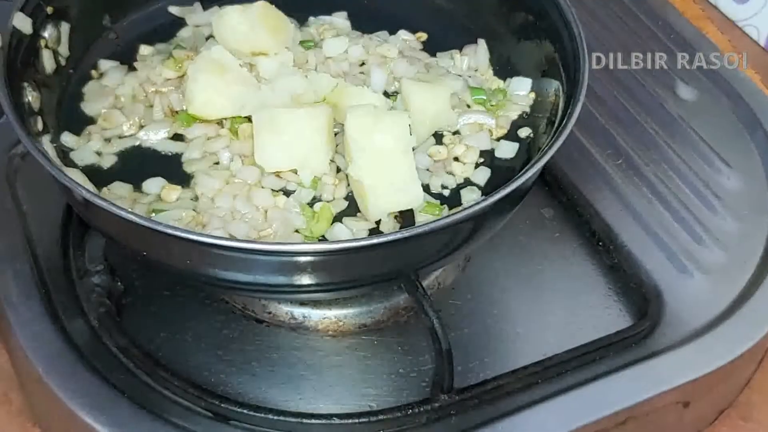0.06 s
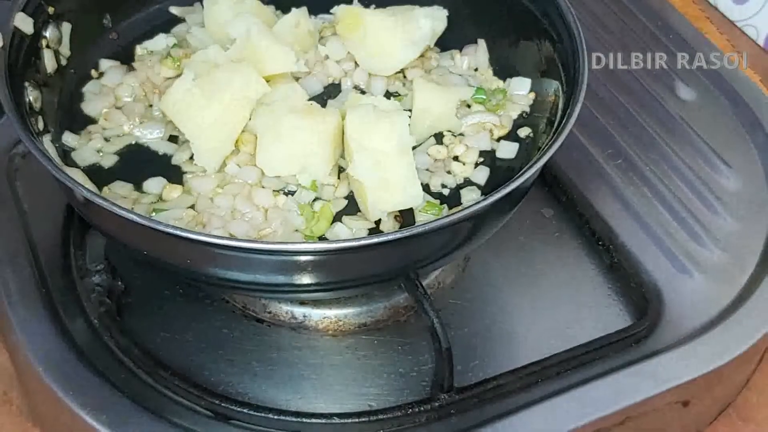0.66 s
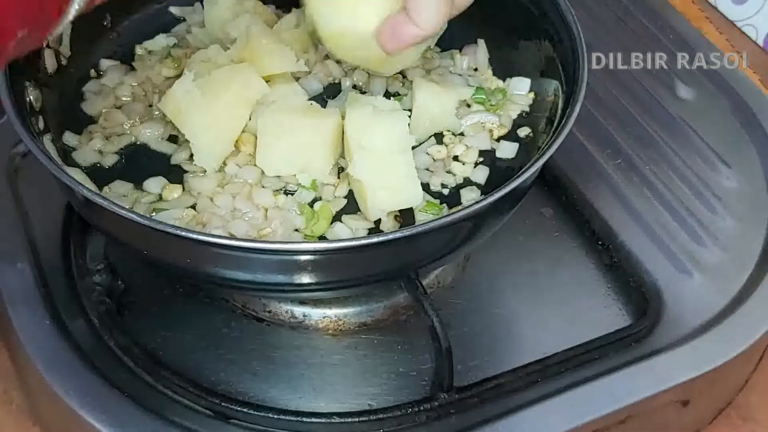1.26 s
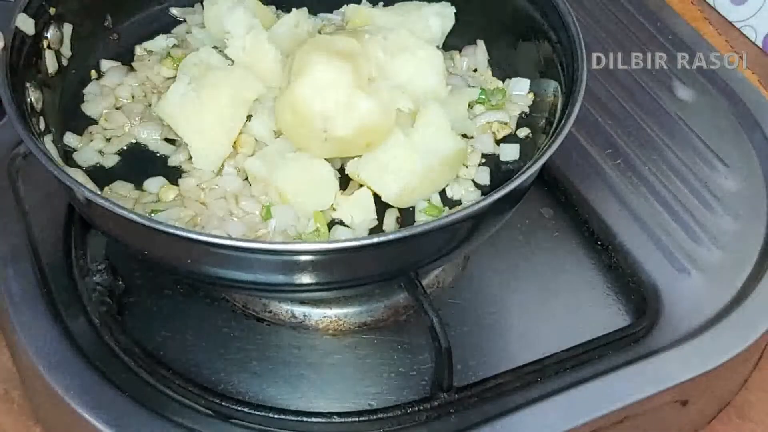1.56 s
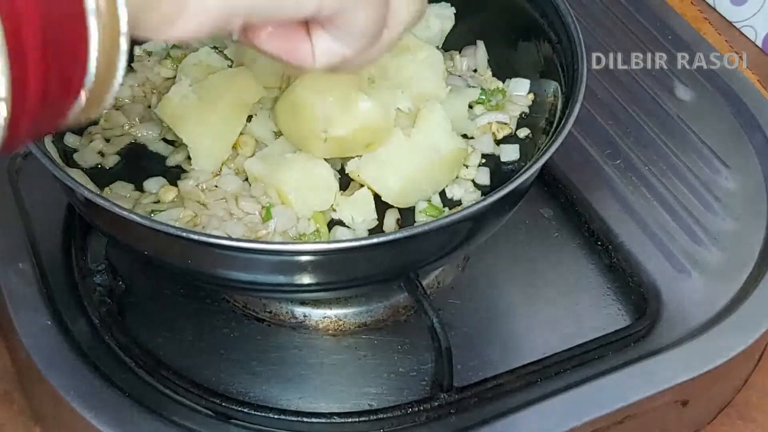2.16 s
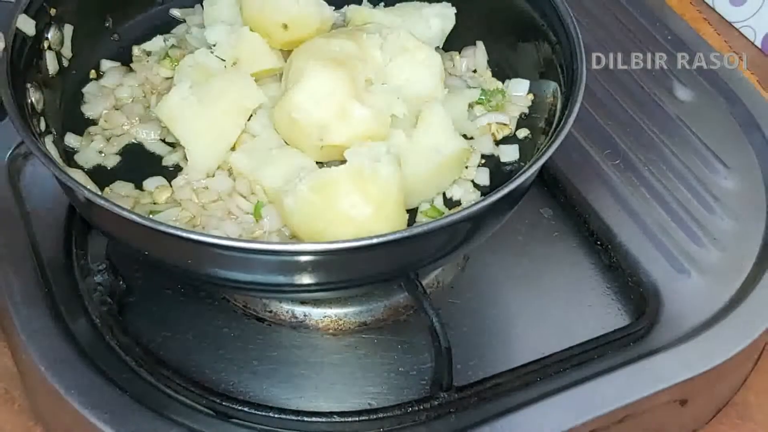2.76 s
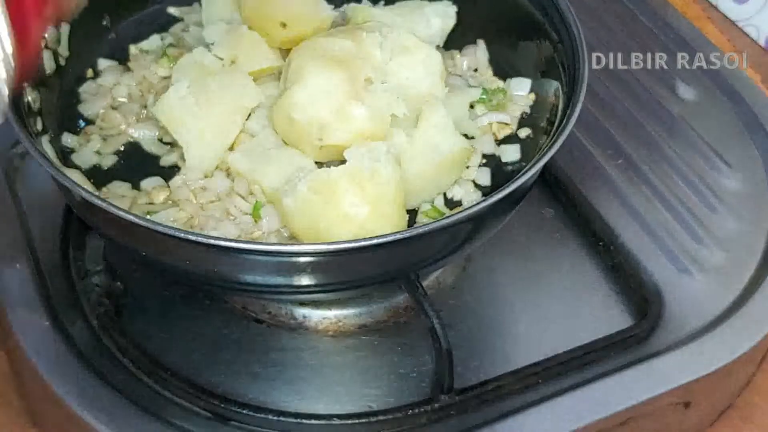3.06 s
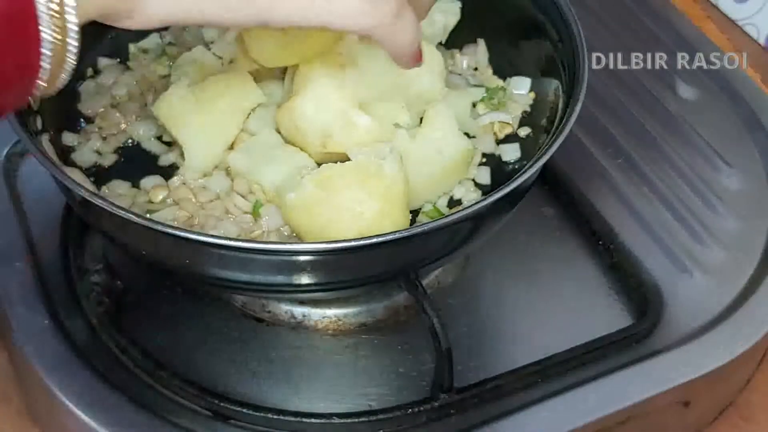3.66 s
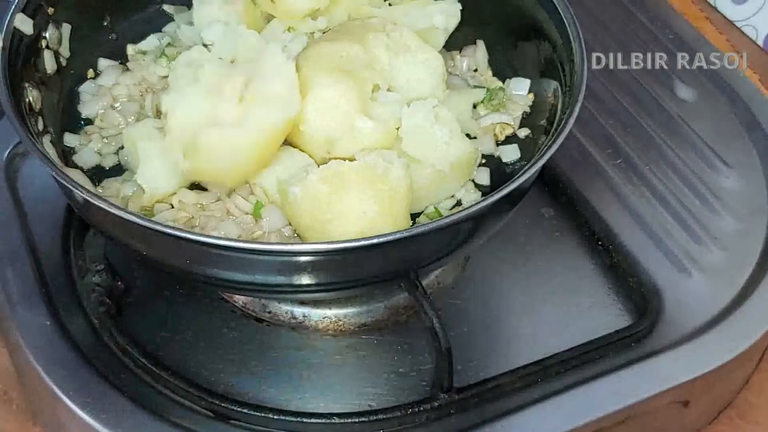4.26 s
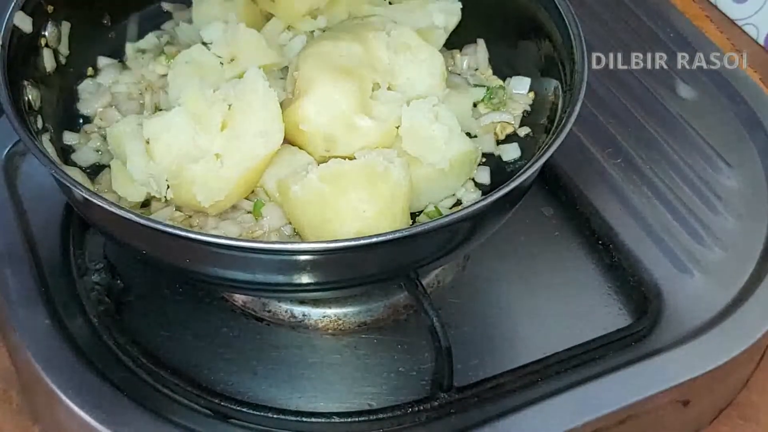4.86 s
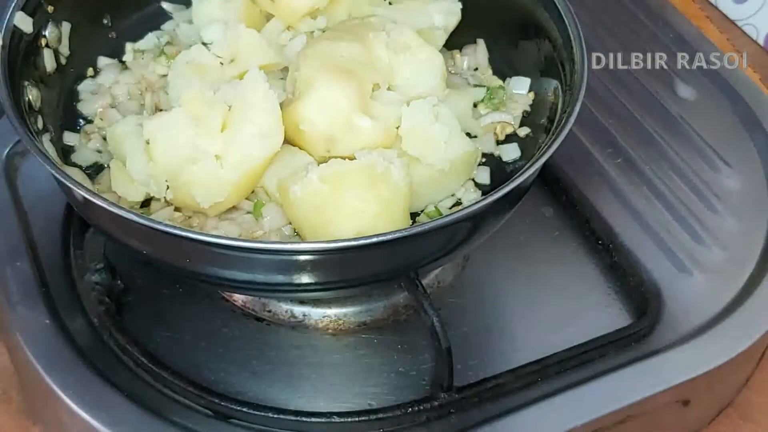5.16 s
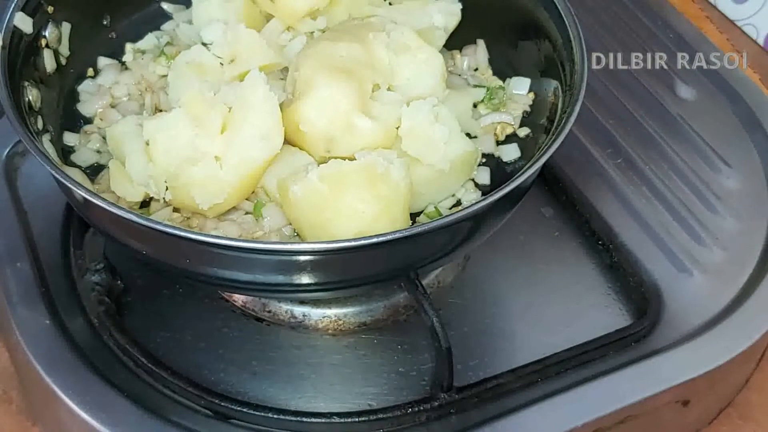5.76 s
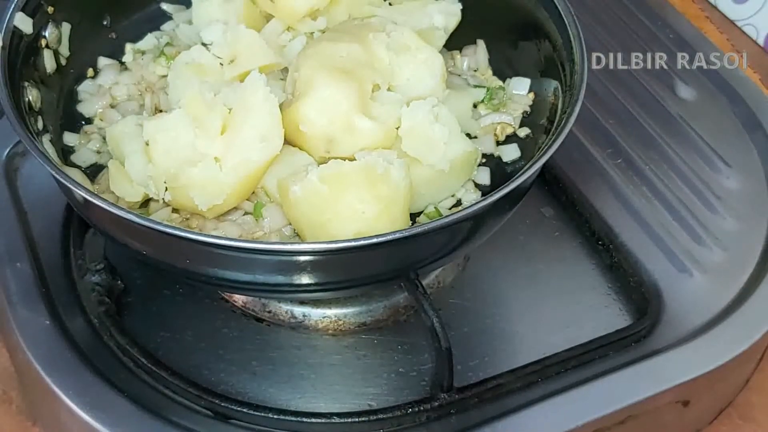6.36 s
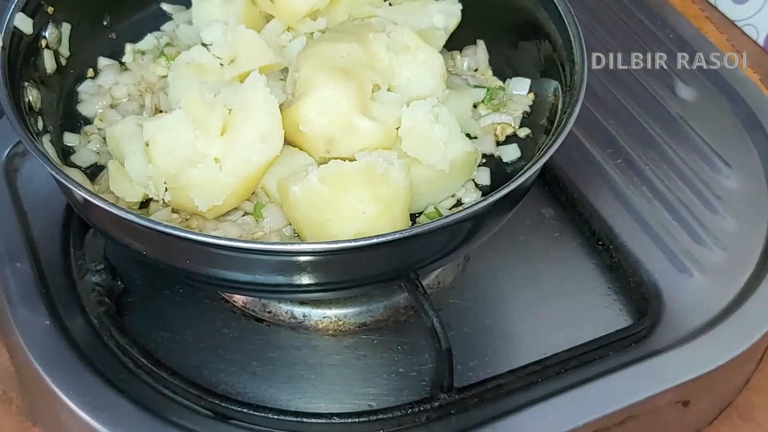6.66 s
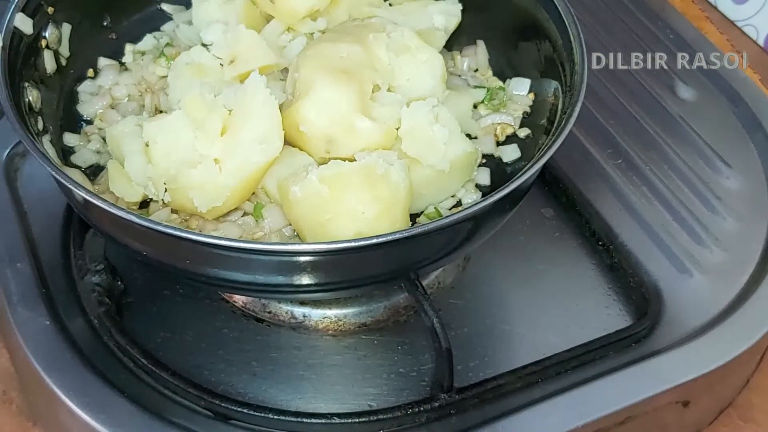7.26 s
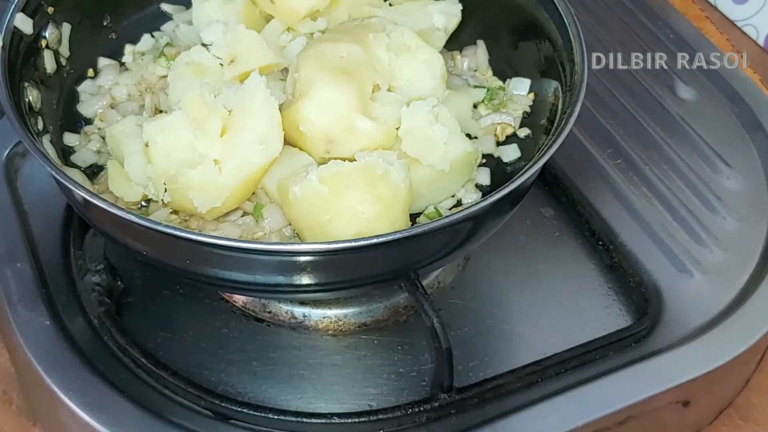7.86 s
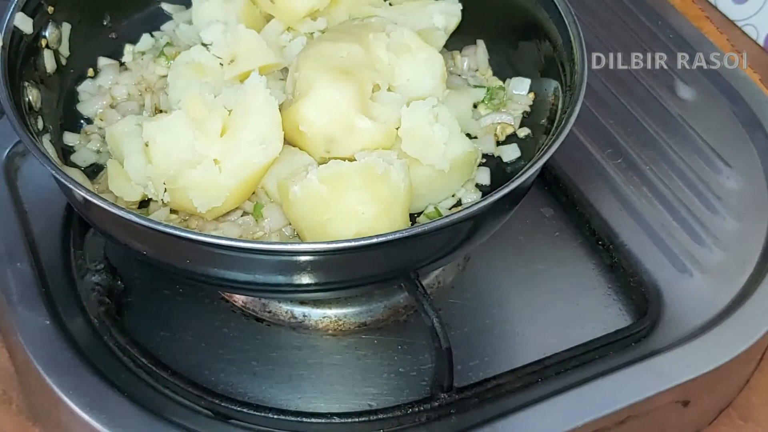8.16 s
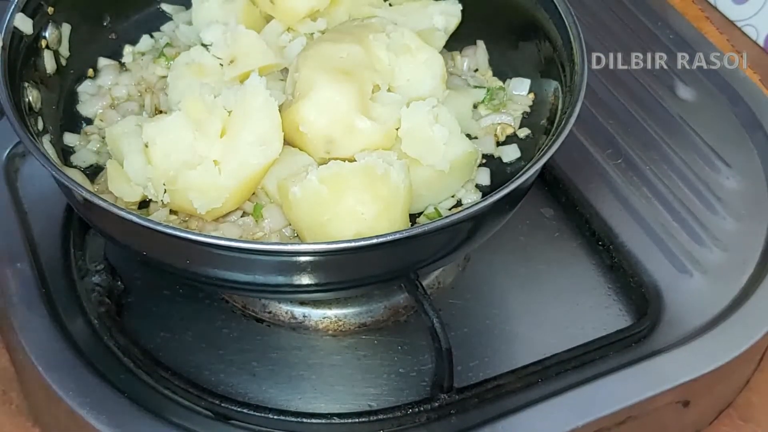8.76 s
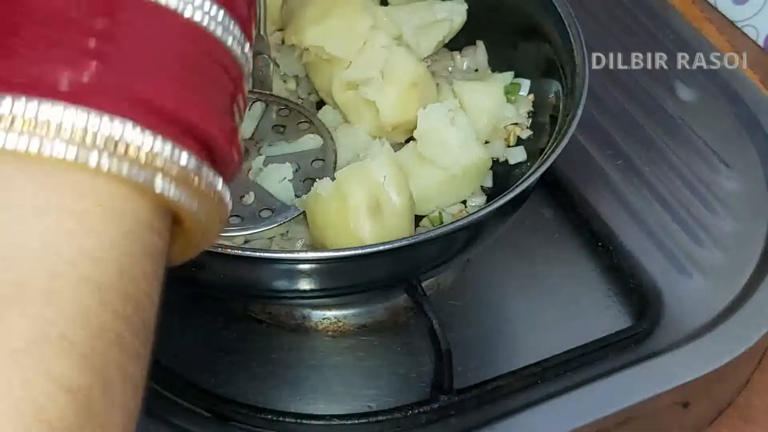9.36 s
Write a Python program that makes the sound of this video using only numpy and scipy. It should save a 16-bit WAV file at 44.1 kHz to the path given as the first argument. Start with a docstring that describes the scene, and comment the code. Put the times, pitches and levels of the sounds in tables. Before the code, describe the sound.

Onions sizzle gently over a humming gas burner as potatoes drop in, dishes clack, and something rumbles across the worktop.

```python
"""Chopped onions fry gently over a humming gas burner, and water drops spit in the oil now and then.
From 1.4 s boiled potatoes are dropped in by hand: the frying flares, steam puffs out, bangles jingle
and more steam squeaks faintly. Around 4 s a bowl and then a plate clack beside the stove.
Near 7 s something is dragged across the worktop with a hollow rumble, and steel clinks lightly.
Just after 9 s a steel spatula comes down into the pan and the frying flares again."""
import sys
import numpy as np
from scipy import signal
from scipy.fft import rfft, irfft, next_fast_len
from scipy.io import wavfile

SR = 44100
rng = np.random.default_rng(int(sys.argv[2]) if len(sys.argv) > 2 else 0)


def put_to_file(sound):
    """Save the sound as 16-bit audio at rate SR, in the file named by the first command-line argument."""
    columns = np.atleast_2d(sound).T  # one column per channel
    safe = np.clip(columns, -1, 1)
    whole_steps = np.round(safe * 32767)
    wavfile.write(sys.argv[1], SR, whole_steps.astype(np.int16))


N = 418509
TIME = np.arange(N) / SR


def from_db(db):
    """Turn decibels into a number to multiply by."""
    return 10 ** (np.asarray(db) / 20)


def unit_level(x):
    """Scale a sound so that its average strength (rms) is 1."""
    return x / np.sqrt(np.mean(x ** 2) + 1e-20)


def colour(x, spectrum):
    """Turn pitches up or down along a curve of (f/Hz, level/dB) points."""
    hz, db = np.transpose(spectrum)
    size = next_fast_len(N, True)
    bins = np.fft.rfftfreq(size, 1 / SR)
    gain = from_db(np.interp(np.log(bins + 1), np.log(hz), db))
    return irfft(rfft(x, size) * gain, size)[..., :N]


def low_pass(x, hz, order=2):
    """Dull a sound above hz."""
    return signal.sosfilt(signal.butter(order, min(hz, SR / 2 - 100), fs=SR, output="sos"), x + 1e-18)


def high_pass(x, hz):
    """Thin out a sound below hz."""
    return signal.sosfilt(signal.butter(2, hz, "high", fs=SR, output="sos"), x)


def drift(per_s):
    """A random wobble of about size 1 that heads for a new value per_s times a second."""
    targets = rng.standard_normal(4096)
    return unit_level(np.interp(TIME * per_s, np.arange(len(targets)), targets))


def stereo_noise(alike):
    """Hiss for two ears: alike is 0 for nothing shared, 1 for the same in both."""
    return np.sqrt(alike) * rng.standard_normal(N) + np.sqrt(1 - alike) * rng.standard_normal((2, N))


def clicks(per_s, spread_db):
    """Random clicks of uneven size."""
    sizes = from_db(spread_db * np.minimum(rng.exponential(1, N), 5))
    return unit_level(sizes * rng.choice([-1, 1], N) * (rng.random(N) < per_s / SR))


def scatter(x, decay_s):
    """Nearby metal surfaces smear each click, differently for each ear."""
    t = TIME[:SR // 20]
    echoes = rfft(rng.standard_normal((2, len(t))) * np.exp(-t / decay_s))
    evened = irfft(echoes / np.abs(echoes) ** .5)   # so that no pitch sticks out much
    evened /= np.sqrt(np.sum(evened ** 2, axis=1, keepdims=True))
    return signal.oaconvolve(x[None], evened[:, :len(t) // 2], axes=1)[:, :N]


def resonate(force, tones):
    """Make an object ring at its own tones; the narrow ones ring longest."""
    out = 0
    for hz, width, db in tones:
        r = np.exp(-np.pi * width / SR)   # share of the ringing left after one sample
        feedback = [1, -2 * r * np.cos(2 * np.pi * hz / SR), r * r]
        out = out + from_db(db) * (1 - r * r) / 2 * signal.lfilter([1, 0, -1], feedback, force + 1e-18)
    return out


def struck(blows, tones, alike, kick_db, crunch_db, ear_lag_s=0.000085):
    """Each blow is one kick plus a fading crunch of tiny collisions; both make the object ring."""
    crunch, kick, noise = np.zeros((2, N)), np.zeros((2, N)), stereo_noise(alike)
    for s, db, decay_s, bright_hz in blows:
        span = slice(int(s * SR), int(s * SR) + SR // 2)
        t = TIME[span] - TIME[span][0]
        envelope = np.exp(-t / decay_s) * (1 - np.exp(-t * bright_hz / 2))
        crunch[:, span] += from_db(db) * low_pass(noise[:, span] * envelope, bright_hz)
        # the kick carries the energy of the crunch and reaches the left ear first
        impulse = np.array([t == 0, t == t[int(ear_lag_s * SR)]]) * np.linalg.norm(envelope)
        kick[:, span] += from_db(db) * low_pass(impulse, bright_hz)
    return crunch + resonate(from_db(kick_db) * kick + from_db(crunch_db) * crunch, tones)


def with_decays(blows, decay_s, at_hz):
    """Give each blow a fading time: decay_s at brightness at_hz, longer if softer and duller."""
    return [(s, db, decay_s * (at_hz / hz) ** 0.87, hz) for s, db, hz in blows]


def sizzle(per_s, spread_db, hiss_db, decay_s, spots=4):
    """Tiny bursts at several spots in the oil, over a smooth hiss of steam."""
    bursts = sum(scatter(clicks(per_s / spots, spread_db), decay_s) for _ in range(spots))
    return unit_level(bursts) + from_db(hiss_db) * stereo_noise(alike=0.031)


# how strong the crackle and the fizz are at each pitch: f/Hz, level/dB
CRACKLE_COLOUR = [(300, -4.5), (600, -9), (850, -5), (1100, 0), (1400, -1), (1850, 0), (2350, 4.5),
                  (3100, 1.5), (4200, 2), (5500, -2), (7200, -3), (10000, -2), (16000, -3.5)]
FIZZ_COLOUR = [(2500, -37), (5500, -2), (7300, 0.5), (8800, 2), (10300, 1.5), (12000, 3.5), (14000, 1),
               (16000, -1.5)]
# potatoes land or are pushed onto hot metal: t/s, crackle boost/dB, fizz boost/dB
FLARES = [(1.42, 1, 2), (2.58, 0.5, 1.5), (9.17, 2.5, 5.5)]

def frying(flicker_db=0.87, sink_s=4.6, flare_rise_s=0.2):
    """Wet onion crackles and the finest droplets fizz above it; both flicker and flare together."""
    crackle = sizzle(per_s=6000, spread_db=3, hiss_db=-1, decay_s=0.0023)
    fizz = sizzle(per_s=4600, spread_db=5, hiss_db=15.5, decay_s=0.00072)
    crackle_db = -42
    fizz_db = np.interp(TIME, [0, sink_s], [-39.5, -44])   # the fizz sinks slowly from the start until sink_s
    for s, crackle_boost_db, fizz_boost_db in FLARES:
        age = np.maximum(TIME - s, 0) / flare_rise_s
        swell = age * np.exp(1 - age)   # rises fast, then dies as the water boils off
        crackle_db += crackle_boost_db * swell
        fizz_db += fizz_boost_db * swell
    crackle = from_db(crackle_db) * unit_level(colour(crackle, CRACKLE_COLOUR))
    fizz = from_db(fizz_db) * unit_level(colour(fizz, FIZZ_COLOUR))
    return from_db(flicker_db * drift(18)) * (crackle + fizz)


# how strong the flame is at each pitch: f/Hz, level/dB
BURNER_COLOUR = [(20, -23), (40, -42), (54, -13.5), (68, -11.5), (82, -0.5), (96, 4), (116, -5.5),
                 (138, -4.5), (170, -17), (215, -20), (280, -30), (420, -50), (900, -40.5)]

def burner(flutter_db=3):
    """The gas flame gives a low, fluttering hum."""
    hum = unit_level(colour(stereo_noise(alike=0.65), BURNER_COLOUR))
    return from_db(-40.5 + flutter_db * drift(9)) * hum


# the loudest spits of oil and the pitch of their snap: t/s, level/dB, f/Hz
SPITS = [(0.2156, -26.5, 11000), (.663, -31, 9500), (1.851, -25.5, 6360), (1.995, -28, 11500),
         (3.522, -33, 10500), (5.1147, -25.5, 7000), (6.5686, -26.5, 7500), (6.917, -30.5, 10500),
         (8.739, -33, 11000), (8.868, -35, 10500), (9.219, -28, 9000), (9.388, -24.5, 8000)]

def spits(snap_s=0.00029, spray_s=0.014, faint_per_s=0.8, faint_db=-37.5, faint_hz=7500):
    """A water drop bursts in the oil: a sharp snap, then a short spray. Faint ones come at random."""
    out, noise = np.zeros((2, N)), stereo_noise(alike=0.27)
    t = TIME[:SR // 16]
    chance = rng.random((int(faint_per_s * N / SR), 2))
    faint = [(when * TIME[-len(t) - 1], faint_db, faint_hz * 2 ** (pitch - .5)) for when, pitch in chance]
    for s, db, hz in SPITS + faint:
        span = slice(int(s * SR), int(s * SR) + len(t))
        snap = from_db(10) * np.exp(-t / snap_s) * np.sin(2 * np.pi * hz * t)
        spray = from_db(-2) * noise[:, span] * np.exp(-t / spray_s)
        out[:, span] += from_db(db) * high_pass(snap + spray, 0.33 * hz)   # high snaps have thin sprays
    return out


# soft blows in the pan: t/s, level/dB, brightness/Hz
PAN_BLOWS = [(1.404, -39, 600), (1.808, -38, 1100), (1.852, -36.5, 1200), (2.579, -29, 910),
             (2.591, -23.5, 1440), (2.607, -37, 900), (6.74, -37, 300), (8.751, -30, 298),
             (9.0, -33.5, 300), (9.15, -26.5, 263), (9.174, -25.5, 2600), (9.186, -31, 2000),
             (9.359, -35.5, 260)]
# the tones the pan rings at: f/Hz, width/Hz, level/dB
PAN_TONES = [(90.5, 61, 15), (288, 95, 8.5), (464, 37, 9.5), (720, 130, 6), (1020, 260, 8), (1485, 180, 8),
             (1700, 71, -5.5), (1777, 97, 13.5)]

def pan():
    """Potatoes, and later the spatula, thud into the pan and make it ring briefly."""
    blows = with_decays(PAN_BLOWS, decay_s=0.011, at_hz=1400)
    return struck(blows, PAN_TONES, alike=0.52, kick_db=-4, crunch_db=2)


# puffs of steam and wet squelches, by their middle in time and pitch: t/s, level/dB, f/Hz
PUFFS = [(1.87, -51, 5030), (2.245, -37, 9000), (2.595, -28.5, 8000), (2.735, -35.5, 5000),
         (2.845, -38.5, 3500), (4.70, -35.5, 1990), (4.963, -32, 4500), (5.41, -32, 8000),
         (5.995, -37, 8000)]

def puffs(half_width_s=0.017):
    """Trapped steam escapes in brief swells of hiss."""
    out, noise = np.zeros((2, N)), stereo_noise(alike=0.034)
    for s, db, hz in PUFFS:
        span = slice(int(s * SR) - SR // 10, int(s * SR) + SR // 10)
        swell = np.exp(-((TIME[span] - s) / half_width_s) ** 2)
        band = signal.butter(1, [hz / 3, min(hz * 2, SR / 2 - 2000)], "band", fs=SR, output="sos")
        out[:, span] += from_db(db) * signal.sosfilt(band, noise[:, span] * swell)
    return out


# the bangles touch: t/s, level/dB, decay/s, brightness/Hz
JINGLES = [(2.318, -44, .02, 9000), (2.332, -43, 0.017, 9000)]
# the tones the bangles ring at: f/Hz, width/Hz, level/dB
BANGLE_TONES = [(4230, 120, 19.5), (4500, 150, 15), (4870, 250, 15)]

def bangles():
    """Bangles slide together on the wrist with a small, high jingle."""
    return struck(JINGLES, BANGLE_TONES, alike=0.1, kick_db=-12, crunch_db=2)


# squeaks of steam: t/s, length/s, starting f/Hz, level/dB
SQUEAKS = [(2.62, 0.17, 1240, -58), (2.848, 0.4, 2420, -65), (4.877, 0.17, 2560, -58.5),
           (6.17, 0.29, 2670, -57), (6.328, 0.12, 2390, -53.5), (7.86, .17, 2430, -55),
           (8.06, 0.215, 1250, -58), (8.44, 0.21, 1297, -59)]

def squeaks(rest_hz=1508, glide_share=0.3, waver=0.019):
    """Steam forced out under the potatoes whistles shakily, sliding part of the way to rest_hz."""
    out = np.zeros(N)
    unsteady = 1 + waver * drift(150)
    flutter = from_db(3.8 * drift(60))
    for s, length, start_hz, db in SQUEAKS:
        span = slice(int(s * SR), int((s + length) * SR))
        progress = np.linspace(0, 1, len(TIME[span]))
        hz = (start_hz + (rest_hz - start_hz) * glide_share * progress) * unsteady[span]
        out[span] += from_db(db) * np.sin(np.pi * progress) * np.sin(2 * np.pi * np.cumsum(hz) / SR)
    return kitchen_echo((out * flutter)[None])   # heard off the walls, so blurred


# blows on the bowl: t/s, level/dB, decay/s, brightness/Hz
BOWL_BLOWS = [(2.76, -39, 0.026, 450), (2.835, -40, .015, 500), (3.911, -34, 0.024, 11000),
              (3.9225, -21.5, 0.013, 15000), (3.947, -30, 0.01, 9100), (4.046, -14.5, 0.012, 334),
              (4.082, -40.5, 0.019, 2500), (4.115, -25, 0.0092, 500)]
# the tones the bowl rings at: f/Hz, width/Hz, level/dB
BOWL_TONES = [(343, 5.7, 3.3), (453, 18, 21.7), (851, 52, 7.3), (1320, 140, 9.4), (1740, 25, 7.6),
              (1990, 23, 19.7), (2680, 110, 16), (3540, 130, 3.7), (4220, 48, 8.6), (6140, 220, 4.2),
              (10000, 11000, 2)]

def bowl():
    """The bowl is touched, then knocked so that it rocks and rings."""
    return struck(BOWL_BLOWS, BOWL_TONES, alike=0.16, kick_db=-5, crunch_db=2.5)


# blows on the plate: t/s, level/dB, decay/s, brightness/Hz
PLATE_BLOWS = [(4.315, -26.5, 0.024, 3000), (4.3245, -16.5, 0.014, 7140), (4.36, -23, 0.0093, 2200)]
# the tones the plate rings at: f/Hz, width/Hz, level/dB
PLATE_TONES = [(270, 19, 10), (423, 160, 8.9), (710, 140, 10.6), (1185, 24, 3.9), (1470, 60, 13),
               (1560, 83, 18), (2090, 130, 13.5), (2770, 61, 20.4), (2940, 30, 3.9), (3820, 110, 11)]

def plate():
    """The plate is set down: three quick knocks make one clack."""
    return struck(PLATE_BLOWS, PLATE_TONES, alike=0.056, kick_db=-10.5, crunch_db=-2.5)


def push(start_s, hold_s, release_s, rise_s=0.018):
    """The strength of one push: it rises, holds and fades."""
    age = TIME - start_s
    return np.clip(age / rise_s, 0, 1) * np.exp(-np.maximum(age - hold_s, 0) / release_s)


# shoves across the worktop: t/s, hold/s, level/dB
SHOVES = [(6.867, 0.16, -41.5), (7.159, 0.02, -33.5), (7.496, 0.12, -37), (7.648, .14, -33)]
# heavy bumps on the way: t/s, level/dB, decay/s, brightness/Hz
BUMPS = [(6.884, -21.5, 0.056, 170), (7.175, -37, 0.021, 298), (7.661, -21.5, 0.051, 300)]
# the tones the hollow worktop rings at: f/Hz, width/Hz, level/dB
WORKTOP_TONES = [(100, 19, 30), (149.5, 15, 23), (209, 16, 20), (263, 17.5, 26.7), (315, 8.3, 3.2),
                 (368.4, 56, 19), (500, 53, 16.2), (560, 27, 20), (624, 24, 22.2), (699, 16, 16),
                 (917, 16, 18), (1350, 110, 15)]

def drag(dull_hz=700, rasp_hz=1700, lowest_hz=50, boom_hz=130):
    """Slips and rubbing shake the hollow worktop in four shoves; the sliding adds a thin scrape."""
    slips = from_db(-7) * scatter(clicks(per_s=450, spread_db=0.5), decay_s=0.00099)
    friction = slips + stereo_noise(alike=0.54)
    grip = from_db(1.8 * drift(45))
    sliding = push(start_s=7.09, hold_s=0.65, release_s=0.35)   # light sliding joins the shoves
    effort = from_db(-47.5) * sliding
    for s, hold_s, db in SHOVES:
        effort = np.maximum(effort, from_db(db) * push(s, hold_s, release_s=0.075))
    force = low_pass(friction * grip * effort, dull_hz, order=3)
    weight = from_db(-1.5) * low_pass(stereo_noise(alike=1) * effort, boom_hz)   # the load makes it boom
    bumps = struck(BUMPS, WORKTOP_TONES, alike=0.82, kick_db=-4, crunch_db=-16)
    ringing = resonate(force + weight, WORKTOP_TONES)
    rumble = from_db(1) * force + from_db(-2.5) * ringing + from_db(-1) * bumps
    rasp = from_db(1.5) * low_pass(stereo_noise(alike=0.3) * grip * effort, rasp_hz)
    scrape = stereo_noise(alike=0.044) * grip * (from_db(-41.5) * sliding ** 2 + from_db(-19) * effort)
    return high_pass(rumble, lowest_hz) + rasp + scrape


# light clinks of steel: t/s, level/dB, brightness/Hz
CLINKS = [(7.273, -27, 7000), (7.38, -36, 4430), (7.498, -35.5, 5000), (7.602, -27.5, 13000),
          (7.6635, -29, 15000), (7.7045, -29.5, 13000), (9.120, -35.5, 10000), (9.1727, -33.5, 7900)]
# the tones the steel rings at: f/Hz, width/Hz, level/dB
STEEL_TONES = [(3120, 100, 6), (3500, 180, 2), (4540, 580, 3), (6500, 340, 5.6), (11000, 7700, 6.1)]

def spatula():
    """Light taps make the steel spatula ring, high and short."""
    blows = with_decays(CLINKS, decay_s=0.014, at_hz=7000)
    return struck(blows, STEEL_TONES, alike=0.034, kick_db=-14, crunch_db=0.5)


def kitchen_echo(x, fade_s=0.14):
    """The walls send back a short, slightly dull echo that drops 60 dB in fade_s."""
    t = TIME[:SR // 2]
    tail = low_pass(rng.standard_normal((2, len(t))), 3800) * from_db(-60 * t / fade_s) * (t > .005)
    tail /= np.sqrt(np.sum(tail ** 2, axis=1, keepdims=True))
    return signal.oaconvolve(x, tail, axes=1)[:, :N]


def scene():
    """Short kitchen sounds and their echo, over the steady frying and flame."""
    events = spits() + pan() + puffs() + bangles() + bowl() + plate() + drag() + spatula()
    return frying() + burner() + events + from_db(-13.5) * kitchen_echo(events) + squeaks()


# how the left microphone opening colours the sound: f/Hz, level/dB
LEFT_MIC_COLOUR = [(60, 1.5), (100, -2.5), (140, -6), (260, -1.5), (550, -2.5), (1500, -1), (2400, -1),
                   (4000, -0.5), (7200, 0), (8000, -5.5), (8800, -12.5), (10500, -7), (12500, -5.5),
                   (16000, -8)]

def record(dry, cutoff_hz=15900):
    """The left microphone is duller, and both sides lose the very highest pitches."""
    heard = np.array([colour(dry[0], LEFT_MIC_COLOUR), dry[1]])
    return signal.sosfilt(signal.ellip(12, .1, 80, cutoff_hz, fs=SR, output="sos"), heard)


dry = scene()
out = record(dry)
put_to_file(out)
```